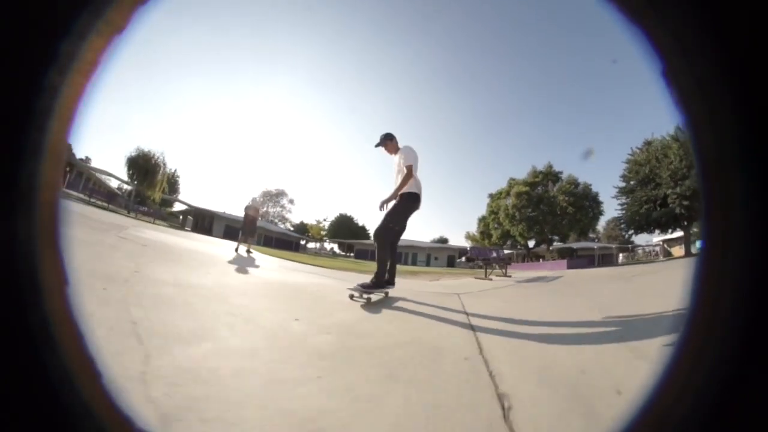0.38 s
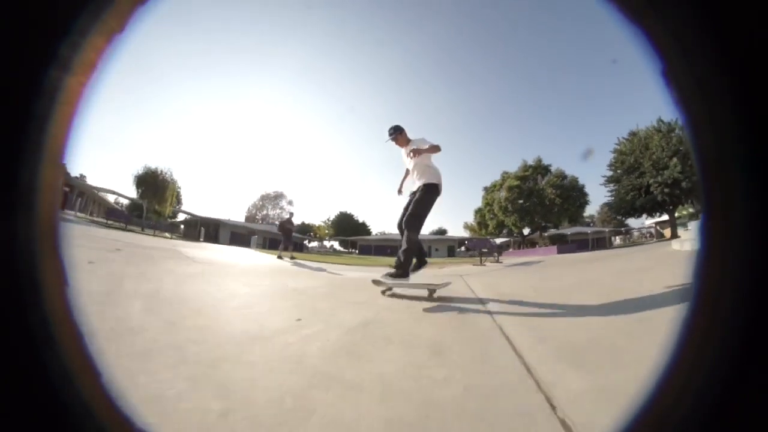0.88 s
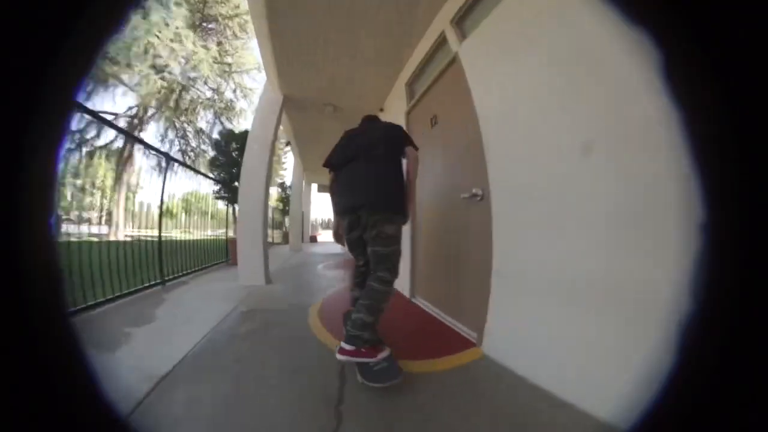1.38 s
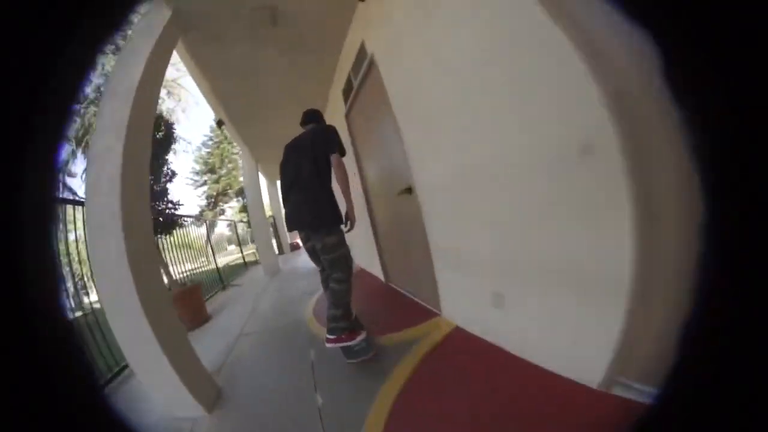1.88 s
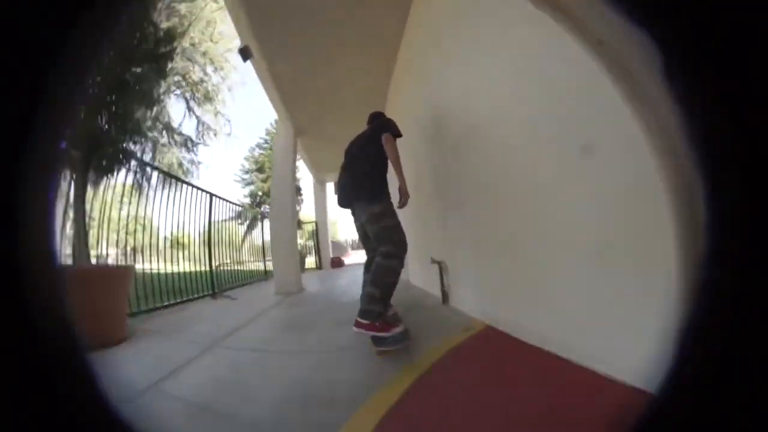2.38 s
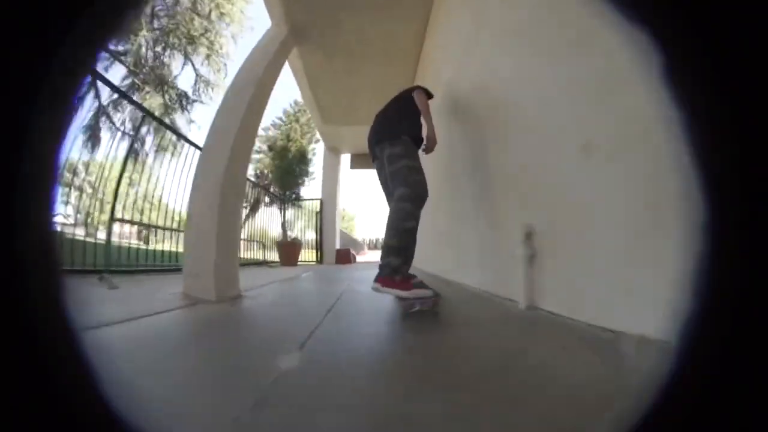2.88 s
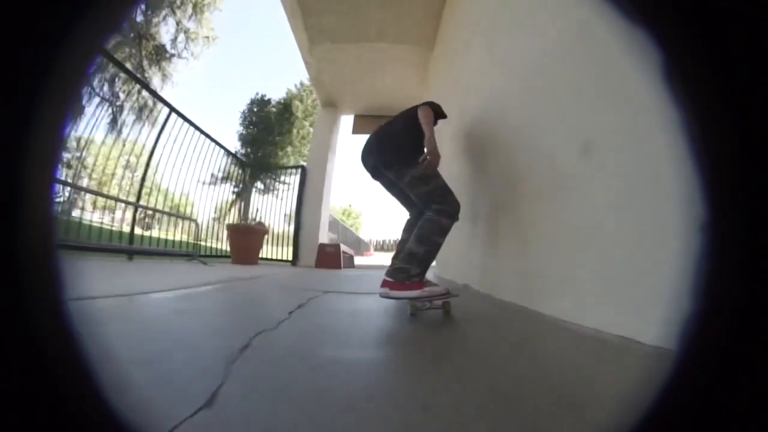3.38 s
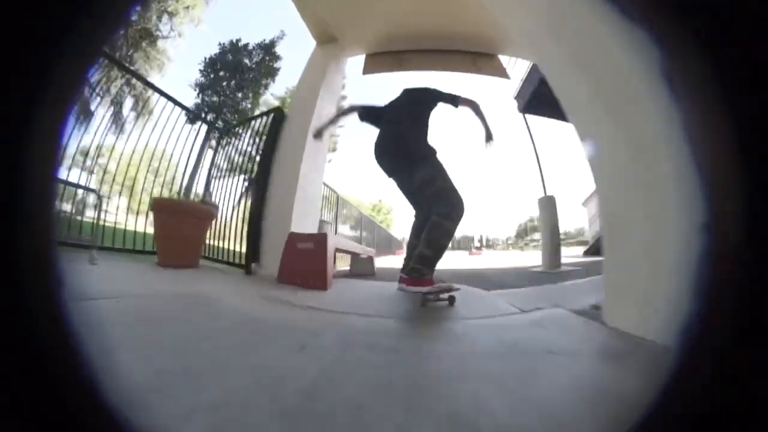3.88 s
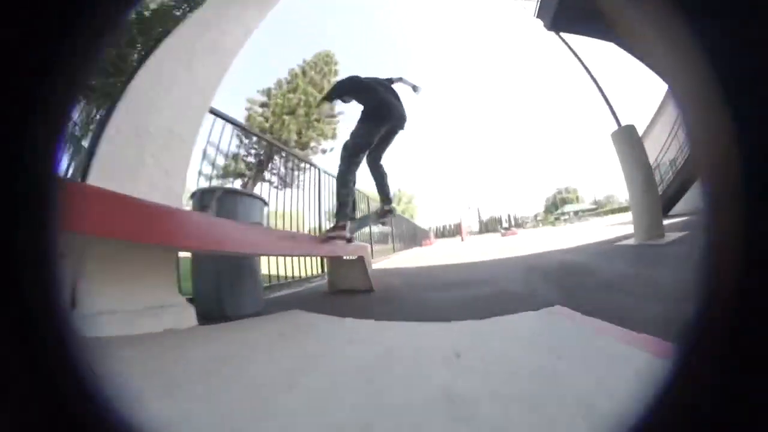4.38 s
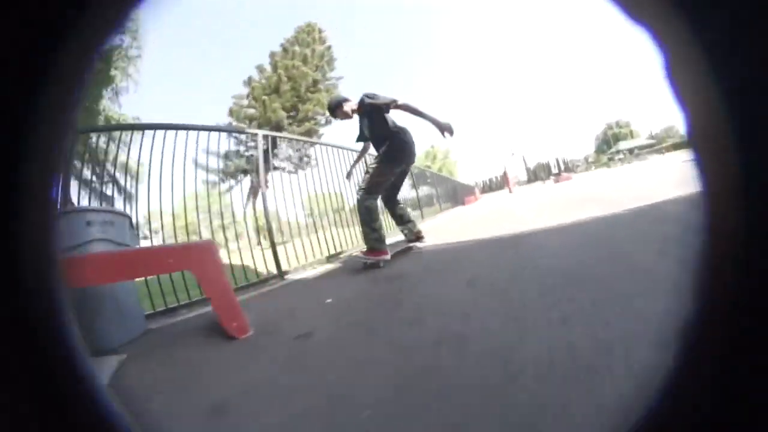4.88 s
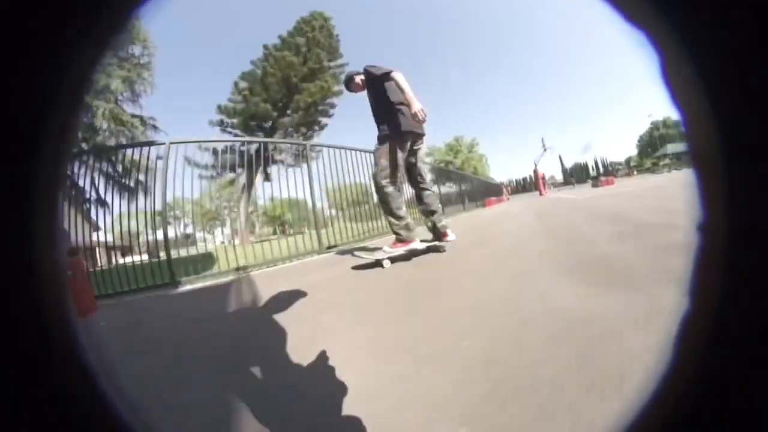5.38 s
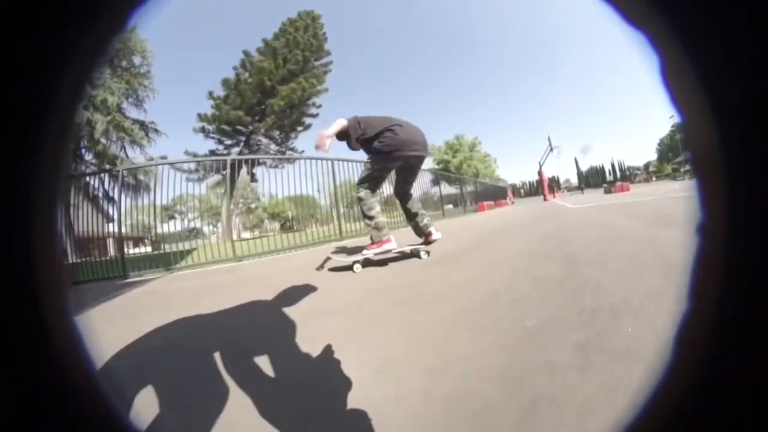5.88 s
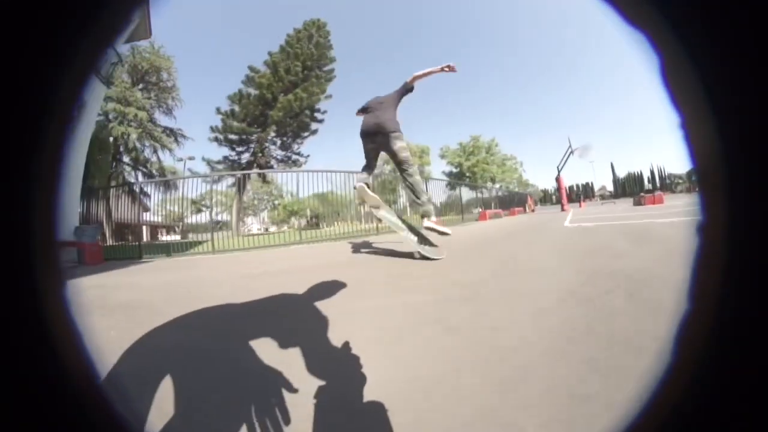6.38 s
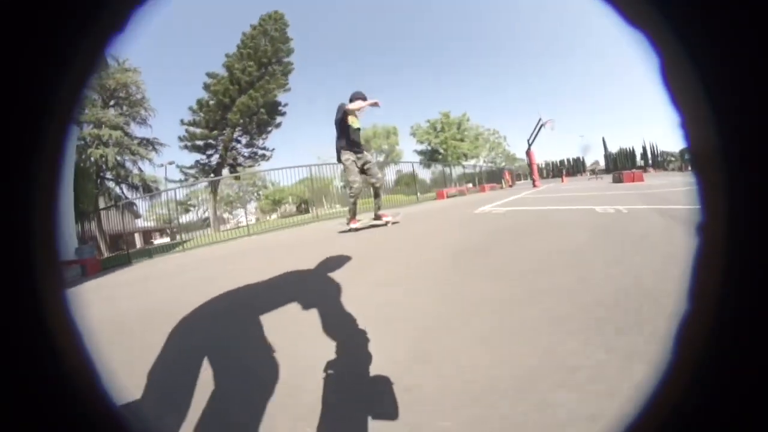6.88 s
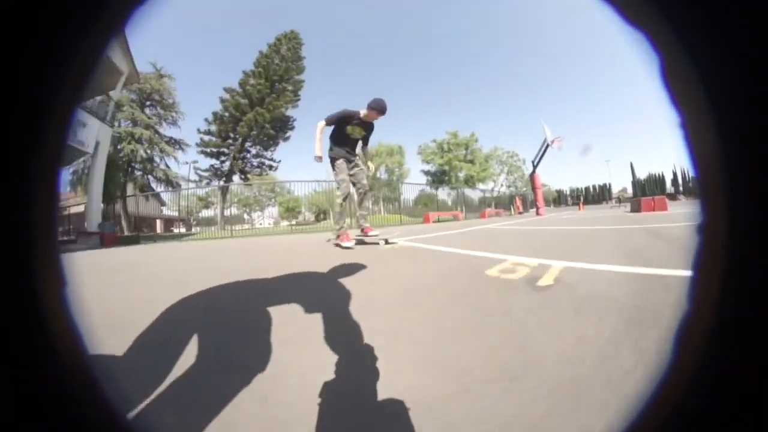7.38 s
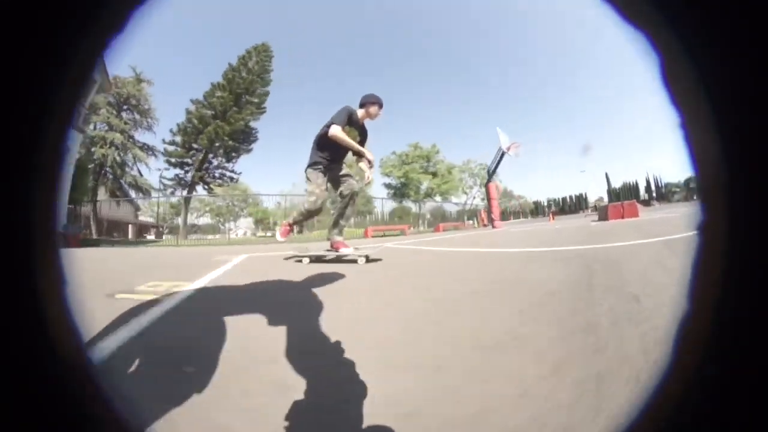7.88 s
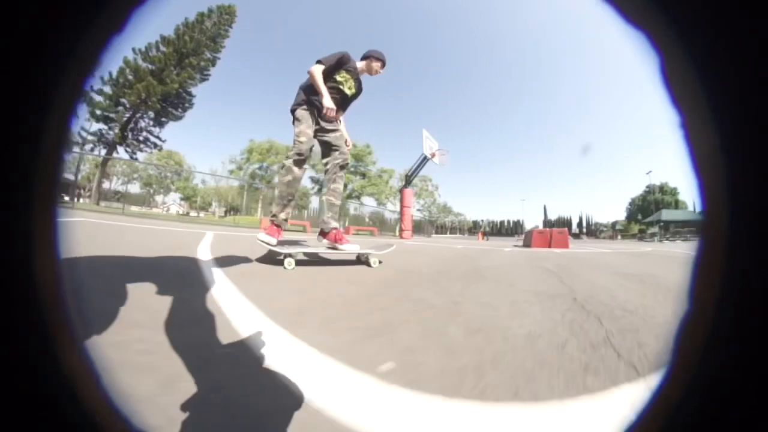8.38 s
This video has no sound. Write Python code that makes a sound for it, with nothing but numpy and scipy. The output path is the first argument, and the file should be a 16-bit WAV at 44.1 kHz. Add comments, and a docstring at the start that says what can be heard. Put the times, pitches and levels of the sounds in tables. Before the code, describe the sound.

Outdoors, skateboard wheels hiss softly over concrete with a few sharp clacks. Abruptly it becomes a loud, boomy roll in a covered walkway, full of wooden knocks and slab-joint clatter. A pop, a hollow half-scrape along a bench edge and a landing crack follow. On open asphalt the roll thins and quiets, then a light pop and a very hard landing snap. The microphone travels on a following board, close to the ground noise and air buffeting.

```python
"""Two skateboards on concrete and asphalt

A skateboard crosses slabs, a covered walkway and asphalt; a second board behind it carries the microphone.
Rolling is grit noise in bands shaken by shared bumps; blows are chatters ringing deck and truck modes.
The deck slides on a bench by stick and slip; treble snaps, pings, squeals, bearing whine and air are added."""
import sys
import numpy as np
from scipy import signal
from scipy.io import wavfile
from scipy.ndimage import uniform_filter1d

SR = 44100
rng = np.random.default_rng(int(sys.argv[2]) if len(sys.argv) > 2 else 0)


def gain_from_db(level_db):
    """Convert decibel levels to linear amplitude factors (20 dB per decade)."""
    decades = np.asarray(level_db, float) / 20
    return 10 ** decades


def output_pcm(signal):
    """Save a mono or channel-first signal as 16-bit PCM at the path in sys.argv[1].

    Samples are clipped to [-1, 1] before scaling.
    """
    pcm = np.clip(np.atleast_2d(signal).T, -1, 1) * 32767
    wavfile.write(sys.argv[1], SR, np.round(pcm).astype(np.int16))


N = 374850


def rms_one(x):
    """Scale to unit power."""
    return x / np.sqrt(np.mean(x ** 2) + 1e-20)


def loudest_one(x):
    """Scale each blow so that its loudest 4 ms have unit power."""
    power = uniform_filter1d(np.mean(x ** 2, axis=0), size=176, axis=-1)
    return x / np.sqrt(np.max(power, axis=-1, keepdims=True))


def in_time(rows):
    """Every column of a curve, sample by sample."""
    s, *columns = np.transpose(rows)
    return [np.interp(np.arange(N) / SR, s, column) for column in columns]


def at_hz(points, hz):
    """Read a spectrum on a log frequency axis."""
    points_hz, values = np.transpose(points)
    return np.interp(np.log(hz), np.log(points_hz), values)


def band(x, low_hz, high_hz):
    """Causal band-pass, 12 dB per octave on each side."""
    return signal.sosfilt(signal.butter(2, [low_hz, high_hz], "band", fs=SR, output="sos"), x)


def mode(x, hz, t60_s):
    """Resonator: a unit click starts a decaying sine of height 1."""
    r, w = gain_from_db(-60 / (t60_s * SR)), 2 * np.pi * hz / SR
    return signal.lfilter([0, np.sin(w)], [1, -2 * r * np.cos(w), r * r], x + 1e-18)


def drift(rate_hz):
    """Slow random curve of spread 1, computed at every 40th sample."""
    r = np.exp(-80 * np.pi * rate_hz / SR)
    slow = signal.lfilter([1], [1, -2 * r, r * r], rng.standard_normal(N // 40 + 2002))[2000:]
    return np.interp(np.arange(N) / 40, np.arange(len(slow)), rms_one(slow))


def grit(shape, spread_db):
    """Dense tiny impacts of widely varying strength."""
    strength_db = spread_db * np.minimum(rng.exponential(1, shape), 6)
    return rms_one(rng.standard_normal(shape) * gain_from_db(strength_db))


def narrow(pitch_hz, width_hz):
    """Narrow band of noise, different in each ear, that follows a moving pitch."""
    lowpass = signal.butter(2, width_hz / 2, fs=SR, output="sos")
    flutter = signal.sosfilt(lowpass, rng.standard_normal((2, 2, N)))
    phase = 2 * np.pi * np.cumsum(pitch_hz) / SR
    return rms_one(flutter[0] * np.cos(phase) + flutter[1] * np.sin(phase))


def sided(lean_db):
    """Left and right gains that differ by lean_db."""
    return gain_from_db(lean_db / 2 * np.array([[1], [-1]]))


def widened(x, spread_db):
    """Raise or lower what differs between the ears."""
    middle = x.mean(axis=0)
    return middle + gain_from_db(spread_db) * (x - middle)


# Each row: frequency in Hz, left-right likeness as a share.
LIKENESS = [(60, 1), (150, 0.79), (380, 0.93), (950, 0.88), (2380, 0.39), (5980, 0.2), (15000, 0.32)]
# Each row: frequency in Hz, left over right in dB.
BALANCE_DB = [(60, 0.5), (150, 0), (380, -0.5), (950, 1), (2380, 1.5), (5980, -1.5), (15000, -3)]


def texture(spectrum, bumps_db, patchy_db, spread_db, per_octave):
    """Grit in narrow bands under shared bumps; each band has its own flicker and stereo width."""
    out, white = 0, grit((2, 2, N), spread_db)
    low_hz, high_hz = spectrum[1][0] * 0.85, min(spectrum[-2][0] * 1.15, 0.4 * SR)
    edges_hz = np.geomspace(low_hz, high_hz, int(per_octave * np.log2(high_hz / low_hz)) + 2)
    for k, (low, high) in enumerate(zip(edges_hz, edges_hz[1:])):
        mid, side = band(white[k % 2], low, high)
        hz = np.sqrt(low * high)
        side_share = np.clip(1 - at_hz(LIKENESS, hz), 0.06, 1)
        level = gain_from_db(at_hz(spectrum, hz) + patchy_db * drift(17.0) + bumps_db)
        stereo = np.sqrt(2 - side_share) * mid + np.sqrt(side_share) * side * [[1], [-1]]
        out = out + level * sided(at_hz(BALANCE_DB, hz)) * stereo
    return rms_one(out)


# Followed board, one list per stretch of ground.
# Each row: time in seconds, load on the wheels in dB, grit under the wheels in dB, left-right lean in dB.
ROLL = [
    [(0.0, -31, -56, -1), (0.082, -42, -73, 6.5), (0.166, -40, -61.5, 1), (0.246, -36.5, -64, 2),
     (0.534, -33.5, -54, 1.5), (0.596, -39, -64, 9), (0.654, -36, -64.5, 8), (0.712, -32.5, -57, 1.5),
     (0.864, -41, -60.5, 4.5), (0.898, -40, -59, 5), (0.926, -36, -59, 8), (0.93, -39.5, -60, -2),
     (1.042, -39, -62, -2), (1.172, -40, -53, 3), (1.3, -38, -49.5, 2)],
    [(1.31, -31, -51.5, -3), (1.49, -28, -46.5, -0.5), (1.93, -28.5, -51, -2), (2.05, -25, -42, -1),
     (2.15, -22.5, -41, 0), (2.2, -22, -42.5, -2), (2.29, -23.5, -42.5, -2), (2.62, -22, -46.5, -1.5),
     (2.75, -32.5, -49.5, -1), (2.8, -28.5, -46, -0.5), (3.35, -27.5, -44.5, -2), (3.53, -35, -51, -4),
     (3.89, -32, -50, -4), (3.92, -42, -50, 3), (4.02, -37, -59, -4), (4.06, -42, -43, 2.5),
     (4.21, -41.5, -54, 0)],
    [(4.22, -33.5, -56, 3), (4.37, -30, -60, 8), (4.52, -43.5, -63, 1), (4.77, -35, -65.5, 1),
     (4.99, -35.5, -64.5, 4), (5.28, -37, -67, -1), (5.39, -37, -63.5, 0), (6.04, -35, -63.5, 2.5),
     (6.52, -39.5, -56, 1), (7.25, -37, -61.5, 3.0), (7.47, -37.5, -54.5, 3), (7.91, -36.5, -58, 4.5),
     (8.13, -31, -49, 3.5), (8.27, -30, -54.5, 2.5), (8.5, -34.5, -51.5, 2.5)],
]


def followed_board():
    """Load, grit and left-right lean of the followed board, all in dB."""
    return in_time(np.concatenate(ROLL))


def driven(level_db, grit_share):
    """Layer gain from a weighted mix, in dB, of wheel load and grit."""
    load_db, grit_db, _ = followed_board()
    return gain_from_db(level_db + (1 - grit_share) * load_db + grit_share * grit_db)


# Slabs, smooth walkway, bench, then patches of asphalt.
# Each row: start in seconds, wheel grind in dB, truck rattle in dB, fine sizzle in dB, deck hum in dB.
GROUND = [(0, -4, 0, 2.5, -15), (1.305, 5, -4.5, 0, -5), (4.22, 7.5, 1.5, 3, -14), (4.6, 3.5, 0, -1, -18),
          (5.27, 5, -0.3, 5.5, -10), (5.75, 5, 0, -2, -8), (7.15, 2.5, -1, 3.5, -6.5),
          (7.9, 3.5, -0.5, 3, -9.5)]


def underfoot():
    """Stepwise gains of grind, rattle, sizzle and hum on the ground of the moment."""
    rows = np.array(GROUND)
    current = np.searchsorted(rows[1:, 0], np.arange(N) / SR)
    return gain_from_db(rows[current, 1:].T)


# Board that carries the microphone, one list per stretch of ground.
# Each row: time in seconds, ground rumble in dB, air on the microphone in dB.
CARRIER = [
    [(0.0, -39, -63), (0.166, -45, -72), (0.386, -42, -70), (0.84, -48.5, -70), (1.06, -56, -71),
     (1.3, -51, -64)],
    [(1.31, -36, -49), (1.54, -35, -44), (1.88, -39, -51), (2.14, -31, -50), (2.48, -29, -41),
     (3.05, -34.5, -38.5), (3.52, -37, -42), (4.21, -32.5, -45), (4.37, -28, -56), (4.5, -43, -66)],
    [(4.51, -49, -70), (4.94, -47, -52), (5.26, -48.5, -58), (5.76, -40.5, -49), (6.33, -44, -48),
     (6.87, -39, -47), (7.64, -37.5, -40.5), (7.92, -30, -42), (8.19, -30.5, -36), (8.5, -31, -50)],
]
# Each row: frequency in Hz, relative density in dB per Hz.
RUMBLE = [(44, -38), (75, -3.5), (103, 3), (145, -1.5), (177, 2), (211, -8), (300, -6), (390, -20),
          (660, -120)]


def rumble(bumps):
    """Bass of the carrying board on the ground, swelling as its wheels drop into joints."""
    level = gain_from_db(in_time(np.concatenate(CARRIER))[0]) + thuds()
    return level * texture(RUMBLE, 0.14 * bumps, patchy_db=1.5, spread_db=-1.0, per_octave=4)


# Each row: frequency in Hz, relative density in dB per Hz.
DRONE = [(150, -13), (260, -9), (298, -10.5), (335, -10), (517, -7.5), (630, -7), (742, -7), (812, -11),
         (873, -10), (1000, -12.5), (1300, -59), (2200, -120)]


def drone(bumps):
    """Low-mid rolling noise that follows almost only the wheel load."""
    return driven(-1.05, 0.0041) * texture(DRONE, 0.89 * bumps, patchy_db=1.5, spread_db=4.0, per_octave=6)


# Each row: frequency in Hz, relative density in dB per Hz.
GRIND = [(560, -25), (950, -6), (1060, 0.5), (1260, -3.5), (1770, -3.5), (2060, -15), (2200, -44),
         (2860, -47), (4840, -120)]


def grind(bumps):
    """Midrange wheel grind from load and grit, set by the ground."""
    noise = texture(GRIND, bumps, patchy_db=-1.0, spread_db=1.0, per_octave=8)
    return underfoot()[0] * driven(-3, 0.41) * noise


# Each row: frequency in Hz, relative density in dB per Hz.
RATTLE = [(1240, -24), (2100, -4.5), (2360, -4), (2770, -11.5), (2980, -4), (3170, -8), (3730, -6),
          (4060, -2.5), (4450, -11.5), (6000, -17), (7800, -28), (13200, -120)]


def rattle(bumps):
    """Truck rattle: uneven grit in the treble, strongly shaken by bumps."""
    noise = texture(RATTLE, 2.5 * bumps, patchy_db=0.5, spread_db=4.0, per_octave=6)
    return underfoot()[1] * driven(3.46, 0.69) * noise


# Each row: frequency in Hz, relative density in dB per Hz.
HISS = [(3290, -31), (5600, -0.5), (5650, -7), (6910, -7.5), (7680, -5.5), (9180, -4.5), (12000, -5.5),
        (15600, -55), (22000, -120)]


def hiss(bumps):
    """High treble that follows mostly the grit under the wheels."""
    return driven(0.84, 0.84) * texture(HISS, 2.3 * bumps, patchy_db=0.0, spread_db=3.0, per_octave=3)


# Each row: bending mode in Hz, level in dB, t60 in seconds.
DECK_HUM = [(530, 0, 0.09), (720, -3.5, 0.065)]


def hum(bumps):
    """Loaded deck hums on its bending modes, driven by grit."""
    modes = sum(gain_from_db(db) * mode(grit(N, spread_db=5.0), hz, t60_s) for hz, db, t60_s in DECK_HUM)
    return underfoot()[3] * driven(-1.05, 0.0041) * gain_from_db(2.1 * bumps) * rms_one(modes)


# Plywood deck. Each row: mode in Hz, level in dB, t60 in seconds.
DECK = [(170, -10, 0.049), (265, 2, 0.05), (322, 13, 0.025), (412, -5, 0.068), (534.4, 1, 0.17),
        (580, -5, 0.051), (700, 8, 0.026), (817, 14.5, 0.019), (935, 14.5, 0.021), (1100, 14, 0.021),
        (1156, 10.5, 0.035), (1326, 19, 0.026), (1507, 2.5, 0.036), (1620, 14.5, 0.024), (1870, 9, 0.037)]


def knocks():
    """Pits tap the wheels at random; each tap rings the deck modes with strengths of its own."""
    taps_per_s = 90
    taps = (rng.random(N) < taps_per_s / SR) * gain_from_db(2.9 * np.minimum(rng.exponential(1, N), 4))
    rings = 0
    for hz, db, t60_s in DECK:
        cushioned_db = db - 4 * np.log2(hz / 600)   # the wheels cushion small knocks
        rings = rings + gain_from_db(cushioned_db) * mode(taps * rng.standard_normal(N), hz, t60_s)
    return driven(-3, 0.31) * rms_one(rings)


# Boards turning against each other.
# Each row: time in seconds, spread of the rolling in dB, spread of blows in dB.
SPREAD = [(0, 9, 1), (0.45, 10, -7), (0.6, 5, -6), (0.9, 7, 3.5), (1.25, -3.5, -1), (2.9, -5, 0),
          (3.1, -0.5, 5), (4.1, 2, 1.5), (4.5, -4, -3), (4.7, -1, -3), (5.2, -1, -4), (6.9, 3, 1),
          (7.05, 3.5, -2), (8.5, 3.5, 2)]


def rolling():
    """Wheels on rough ground: shared bumps of the surface shake the noise layers and hum together."""
    lean_db, spread_db = followed_board()[-1], in_time(SPREAD)[0]
    bumps = drift(6.8) + 0.33 * drift(19.0)
    ground = widened(rumble(bumps), 0.5 * spread_db - 1.5)
    body = widened(drone(bumps) + grind(bumps), spread_db) + hum(bumps) + knocks()
    treble = rattle(bumps) + hiss(bumps)
    return ground + body * sided(0.45 * lean_db) + treble * sided(lean_db)


# Each row: frequency in Hz, relative density in dB per Hz.
GUST = [(10, -30), (20, -31), (40, 3.5), (70, 1.5), (120, -30)]


def breeze():
    """Air buffets the moving microphone: patchy deep noise."""
    air_db = in_time(np.concatenate(CARRIER))[1]
    return gain_from_db(air_db) * texture(GUST, 0, patchy_db=-4.5, spread_db=-1.0, per_octave=2)


# Each row: time in seconds, bearing pitch in Hz.
WHINE = [(0, 3250), (1.15, 3150), (1.3, 3200), (1.33, 3380), (2.2, 3380), (4.2, 3200), (5.0, 3100),
         (6.5, 3250), (8.5, 3300)]


def whine():
    """Dry bearing sings faintly: narrow noise on a wandering pitch, with a flickering level."""
    flicker_db = 1.8 * drift(4.6) + 2.0 * drift(28.0)
    return driven(-12.5, 0.42) * gain_from_db(flicker_db) * narrow(in_time(WHINE)[0], width_hz=520)


# Each row: frequency in Hz, relative density in dB per Hz.
SIZZLE = [(7060, -34), (12000, -15), (12700, 22), (15300, 6), (16300, -24)]


def sizzle():
    """Bearing sizzle at the very top, following grit and ground."""
    noise = texture(SIZZLE, 0, patchy_db=-3.5, spread_db=3.5, per_octave=4)
    return underfoot()[2] * driven(-6.5, 0.85) * noise


def struck(force, modes, favour_db):
    """Each blow drives every mode with a strength and a slight detuning of its own."""
    hz, db, t60_s = np.transpose(modes)[..., None]
    strength, shift = rng.standard_normal((2, force.shape[1], len(modes), 1))
    t = np.arange(int(0.06 * SR)) / SR
    mode_db = db + (favour_db + 2.9 * strength[..., 0])[..., None]
    shifted_hz = hz * (1 + 0.039 * shift)   # the rider's weight shifts the modes
    rings = gain_from_db(mode_db) * np.exp(-np.log(1000) * t / t60_s) * np.sin(2 * np.pi * shifted_hz * t)
    return signal.fftconvolve(force, rings.sum(axis=1)[None], axes=-1)[..., :force.shape[-1]]


# Each row: time in seconds, deck level in dB, deck pitch in Hz, truck clack level in dB, contact in seconds.
BLOWS = [(0.023, -35, 580, -47, 0.012), (0.06, -27.5, 496, -37, 0.015), (0.086, -23, 596, -32, 0.0042),
         (0.181, -34, 506, -49, 0.01), (0.263, -25, 500, -56, 0.0049), (0.427, -28, 785, -40, 0.0039),
         (0.519, -26, 1900, -18.5, 0.0017), (0.521, -14, 1140, -22, 0.0031),
         (0.709, -31, 333, -33.5, 0.0022), (0.747, -24.5, 527, -34, 0.0057), (0.848, -31, 476, -43, 0.0063),
         (0.888, -34, 800, -57, 0.004), (0.912, -27, 835, -55, 0.0054), (0.954, -16, 780, -18, 0.0066),
         (0.973, -31, 1500, -32, 0.006), (1.004, -31, 1500, -33, 0.0087), (1.021, -13.5, 1960, -13, 0.0035),
         (1.023, -19, 372, -17, 0.0034), (1.068, -25.5, 310, -53, 0.0035), (1.094, -26, 334, -53, 0.0042),
         (1.193, -30.5, 180, -51, 0.0047), (1.262, -27, 294, -50, 0.0028), (1.334, -22.5, 910, -37, 0.0074),
         (1.424, -19.5, 1040, -41, 0.012), (1.436, -18.5, 630, -37, 0.015), (1.466, -28, 363, -30, 0.0055),
         (1.543, -11, 523, -30, 0.01), (1.582, -16.5, 1330, -37, 0.0071), (1.771, -38, 550, -36, 0.0087),
         (1.862, -21.5, 536, -37, 0.024), (1.959, -9, 1010, -24, 0.0049), (1.971, -13, 850, -35, 0.0045),
         (2.029, -6, 1140, -20.5, 0.0032), (2.04, -10.5, 790, -24, 0.0049),
         (2.071, -8.5, 1230, -24, 0.0024), (2.076, -8, 1150, -24, 0.0029), (2.139, -7.5, 1330, -20, 0.0059),
         (2.151, -7, 1330, -22, 0.0036), (2.168, -13, 572, -39, 0.0066), (2.344, -3.5, 1040, -17, 0.0039),
         (2.353, -4.5, 815, -23, 0.0036), (2.376, -13, 1000, -31, 0.004), (2.4, -16, 1507, -32, 0.01),
         (2.428, -17.5, 800, -28, 0.004), (2.465, -10.5, 1290, -29, 0.0056),
         (2.467, -10.5, 310, -25, 0.011), (2.493, -11.5, 403, -24.5, 0.004),
         (2.505, -10.5, 605, -31, 0.0088), (2.549, -11.5, 600, -35, 0.0015), (2.561, -20, 393, -25, 0.0019),
         (2.617, -15.5, 1910, -29, 0.0032), (2.624, -12, 383, -26, 0.0062), (2.635, -15.5, 810, -28, 0.003),
         (2.687, -21, 746, -49, 0.003), (2.733, -9.5, 570, -27, 0.0057), (2.739, -15, 296, -28, 0.0046),
         (2.755, -16, 550, -32, 0.0075), (2.807, -6.5, 530, -25, 0.0038), (2.82, -13.5, 520, -30, 0.0047),
         (2.93, -7, 510, -24, 0.0054), (2.944, -11.5, 700, -24, 0.0088), (3.091, -20, 345, -36, 0.0039),
         (3.155, -16, 517, -43, 0.01), (3.199, -13.5, 328, -25.5, 0.011), (3.353, -19.5, 520, -50, 0.0073),
         (3.431, -5.5, 1550, -15, 0.0036), (3.445, -5, 647, -19.5, 0.0059),
         (3.558, -9.5, 670, -25.5, 0.0047), (3.571, -8, 520, -30, 0.0045), (3.774, -13, 760, -29, 0.0035),
         (3.78, -11, 720, -26, 0.0044), (3.793, -13, 537, -37, 0.0042), (3.879, -9, 604, -28.5, 0.0046),
         (3.885, -16, 417, -21, 0.0042), (3.894, -14, 530, -28, 0.005), (3.903, -6.5, 600, -24, 0.0044),
         (3.91, -10, 1000, -27, 0.0048), (3.919, -12.5, 845, -20, 0.0087), (4.017, -10, 2250, -8, 0.0038),
         (4.032, -14.5, 1200, -21.5, 0.0087), (4.059, -10, 467, -15, 0.0033),
         (4.069, -11, 915, -28, 0.0048), (4.081, -14, 590, -21, 0.0044), (4.093, -17.5, 800, -28, 0.005),
         (4.236, -18, 1500, -21, 0.0032), (4.2412, -8, 1405, -10, 0.0019), (4.248, -6, 1930, -10.5, 0.0044),
         (4.252, -7, 590, -42, 0.006), (4.258, -8, 209, -41, 0.0082), (4.27, -12, 570, -43, 0.0089),
         (4.401, -18, 505, -64, 0.0081), (4.484, -16.5, 535, -30.5, 0.0057),
         (4.501, -17.5, 630, -34, 0.005), (4.7285, -6.5, 700, -10, 0.0042),
         (4.733, -7, 1290, -14.5, 0.0031), (4.738, -8, 850, -17, 0.0044), (4.745, -12, 1100, -27, 0.0027),
         (4.766, -17.5, 1290, -34, 0.0075), (4.762, -16, 520, -38, 0.0061), (4.777, -21, 530, -38, 0.01),
         (4.8, -22, 494, -36, 0.0085), (4.824, -31, 348, -41, 0.01), (4.891, -23.5, 544, -42, 0.0048),
         (5.004, -32, 856, -38, 0.0072), (5.225, -39, 401, -45, 0.013), (5.285, -21, 1100, -26, 0.0028),
         (5.291, -23, 670, -31.5, 0.0052), (5.352, -30, 530, -44, 0.0063), (5.403, -46, 482, -51, 0.0052),
         (6.409, -23, 1930, -26, 0.0025), (6.414, -28, 1980, -32, 0.003), (6.42, -34, 2000, -28.5, 0.0049),
         (6.477, -44, 727, -33, 0.012), (6.655, -29, 1680, -41, 0.0074), (6.718, -19.5, 466, -22.5, 0.0028),
         (6.794, -9.5, 880, -9.5, 0.0047), (6.801, -3, 1270, -8.5, 0.002), (6.811, -10.5, 1000, -8, 0.0021),
         (6.817, -14, 596, -21, 0.0027), (6.823, -1.5, 1550, -16, 0.0012), (6.828, -16, 450, -35, 0.0022),
         (6.84, -40, 1100, -44, 0.004), (6.855, -23.5, 1300, -34, 0.0072), (6.858, -28, 323, -50, 0.005),
         (6.92, -23.5, 620, -59, 0.004), (7.05, -27, 700, -41, 0.0058), (7.186, -29, 605, -39, 0.0062),
         (7.377, -45, 533, -53, 0.0047), (7.453, -33, 587, -40, 0.0055), (7.501, -32, 670, -36, 0.0062),
         (7.644, -31, 544, -37, 0.0021), (8.064, -26, 1000, -37, 0.0082), (8.078, -21, 930, -39, 0.0041),
         (8.088, -17.5, 560, -42, 0.0069), (8.116, -27, 600, -49, 0.0079), (8.222, -18, 580, -37, 0.0093),
         (8.235, -15, 380, -31, 0.0057), (8.26, -23.5, 300, -46, 0.0072), (8.277, -23, 332, -53, 0.008),
         (8.343, -24, 205, -51, 0.013), (8.384, -20, 248, -48, 0.0055), (8.412, -16.5, 260, -52, 0.0072),
         (8.447, -19, 358, -39, 0.0089), (8.467, -22, 260, -48, 0.0086)]
# Steel trucks. Each row: mode in Hz, level in dB, t60 in seconds.
TRUCKS = [(2200, 17, 0.0049), (2400, 9.5, 0.0054), (2630, 2, 0.01), (3150, 15, 0.0055), (3470, 9.5, 0.0048),
          (4160, 2, 0.014), (4580, 10, 0.003), (4870, 3, 0.012)]
# Open yard, covered walkway, open court.
# Each row: time in seconds, echo in dB, topmost fizz of blows in dB, fizz of blows in dB.
SHELTER = [(0, -4.5, -6, -5.5), (1.3, -14.5, 8, -11), (1.32, -1, -25, -13.5), (4.1, -6.5, -23, -15),
           (4.2, -1.5, -29, -21), (4.55, -1.5, -20.5, -16), (4.6, 1, -14, -12), (6.0, -11.5, -12, -18),
           (8.5, -2, -8, -11)]


def blows():
    """A blow is a short chatter of contacts: it swells, dies, and leaves deck and trucks ringing briefly."""
    s, deck_db, pitch_hz, clack_db, contact_s = np.transpose(BLOWS)[:, :, None]
    t = np.arange(int(0.15 * SR)) / SR
    u = t / np.clip(contact_s, 0.0005, 0.04)
    shared, apart = (1 - np.exp(-u / 0.5)) * np.exp(-u) * grit((2, len(BLOWS), len(t)), spread_db=3.0)
    wide = shared + 0.6 * apart * [[[1]], [[-1]]]   # metal parts at both ends reach the two ears differently

    # where the deck is struck decides which modes speak most
    deck_favour_db = -14.0 * np.abs(np.log2(np.array(DECK)[:, 0] / pitch_hz))
    spot_db = 15.5 - 60 * t * pitch_hz / 14.4   # the struck spot dies by 60 dB in 14.4 cycles
    spot = gain_from_db(spot_db) * np.sin(2 * np.pi * pitch_hz * t)
    spot = signal.fftconvolve(shared, spot, axes=-1)[:, :len(t)]
    slap = gain_from_db(15.5) * shared   # bare slap of wood
    deck = loudest_one(band(struck(shared[None], DECK, deck_favour_db) + spot + slap, 131, 2100))

    # a higher deck pitch favours the lower truck modes
    truck_favour_db = -3.0 * np.log2(np.array(TRUCKS)[:, 0] / 3000) * np.log2(pitch_hz / 600)
    clack = loudest_one(band(struck(wide, TRUCKS, truck_favour_db), 2120, 5070))

    top_db, place_db = np.array(in_time(SHELTER))[1:, (s * SR).astype(int)]
    fizz_db = place_db + 0.54 * clack_db + 0.46 * deck_db
    snap = wide * (1 + 1.8 * np.exp(-t / 0.00092))   # stronger at first touch
    fizz = loudest_one(band(snap, 5000, 12900) + gain_from_db(top_db) * band(snap, 11000, 16000))

    sound = (gain_from_db(deck_db) * deck + gain_from_db(clack_db) * clack + gain_from_db(fizz_db) * fizz) / np.sqrt(2)
    out = np.zeros((2, N + len(t)))
    for start, blow in zip((s[:, 0] * SR).astype(int), sound.transpose(1, 0, 2)):
        out[:, start:start + len(t)] += blow
    return out[:, :N]


# Ground and walls. Each row: left delay in seconds, right delay in seconds, level in dB.
ECHOES = [(.0031, 0.00111, -15.5), (0.014, 0.012, -13), (0.027, 0.036, -18), (.043, 0.065, -20)]


def surroundings(x):
    """A few echoes and a short diffuse tail whose treble dies first, partly different in each ear."""
    t = np.arange(int(0.4 * SR)) / SR
    shared, apart = rng.standard_normal((2, len(t)))
    noise = shared + 0.5 * apart * [[1], [-1]]
    split_hz = 1860
    low_tail = gain_from_db(-35 - 60 * t / 0.35) * band(noise, 58, split_hz)
    treble_tail = gain_from_db(-36 - 60 * t / 0.29) * band(noise, split_hz, 17000)
    response = low_tail + treble_tail
    for left_s, right_s, db in ECHOES:
        response[[0, 1], [int(left_s * SR), int(right_s * SR)]] += gain_from_db(db)
    return signal.fftconvolve(x, response, axes=1)[:, :N]


# Each row: time in seconds, relative level in dB, length in seconds.
SNAPS = [(0.062, -26, 0.0027), (0.08, -33, 0.003), (0.1514, -38, 0.003), (0.182, -35, 0.0025),
         (0.28, -41, 0.003), (0.485, -32, 0.003), (0.519, -26, 0.0026), (0.753, -38, 0.003),
         (0.848, -35, 0.003), (0.954, -14.5, 0.0047), (1.024, -19, 0.0039), (1.044, -29, 0.0036),
         (1.3359, -31, 0.003), (2.04, -30, 0.0033), (2.14, -21, 0.003), (2.155, -18, 0.0033),
         (2.356, -17, 0.0034), (2.47, -24, 0.003), (2.622, -28, 0.0035), (2.743, -25, 0.003),
         (2.931, -43, 0.003), (3.445, -17, 0.0033), (3.882, -15.5, 0.0034), (4.064, -14.5, 0.003),
         (4.735, -13, 0.0022), (4.77, -25, 0.0032), (5.2275, -42, 0.003), (5.269, -38, 0.0029),
         (5.286, -21, 0.0028), (5.303, -33, 0.003), (5.352, -40, 0.003), (6.481, -31.5, 0.0049),
         (6.795, -10.5, 0.0062), (6.814, -18, 0.0033), (6.821, -19, 0.003), (7.048, -38, 0.003),
         (7.1866, -34, 0.003), (7.352, -33, 0.003), (7.3806, -31, 0.0028), (7.406, -37, 0.003),
         (7.4545, -31, 0.0027), (7.482, -31, 0.003), (7.6194, -34, 0.003), (8.181, -31, 0.003),
         (8.2362, -35, 0.003), (8.379, -31, 0.003), (8.4514, -35, 0.003)]


def snaps():
    """Bright treble snaps: short noise bursts, many on the landings and knocks, some alone while rolling."""
    t = np.arange(int(0.05 * SR)) / SR
    shared, apart = grit((2, len(SNAPS), len(t)), spread_db=3.5)
    bursts = rms_one(band(shared + 0.5 * apart * [[[1]], [[-1]]], 5800, 14400))
    out = np.zeros((2, N + len(t)))
    for (s, db, length_s), burst in zip(SNAPS, bursts.transpose(1, 0, 2)):
        u = t / np.clip(length_s, 0.0005, 0.02)
        envelope = (1 - np.exp(-u / 0.44)) * np.exp(-u)
        start = int(s * SR)
        out[:, start:start + len(t)] += gain_from_db(db - 2.0) * envelope * burst
    return out[:, :N]


# Each row: start in seconds, fade in seconds, level in dB, pitch in Hz.
SQUEALS = [(1.152, 0.075, -40, 3150), (1.152, 0.06, -46, 2400), (1.31, 0.12, -47, 3400)]


def squeals():
    """A bearing sings briefly: narrow noise that rises within milliseconds and fades."""
    t = np.arange(N) / SR
    out, rise_s = 0, 0.006
    for s, fade_s, db, hz in SQUEALS:
        u = np.maximum(t - s, 0)
        envelope = (1 - np.exp(-u / rise_s)) * np.exp(-(u / fade_s) ** 2)
        out = out + gain_from_db(db) * envelope * narrow(np.full(N, hz), width_hz=220)
    return out


# Each row: time in seconds, relative level in dB, pitch in Hz.
PINGS = [(1.424, -30.5, 3480), (1.468, -36, 3420), (1.543, -28, 3380), (3.91, -17.5, 3840),
         (4.279, -21, 2950), (4.354, -29, 2300), (4.691, -37, 4670), (4.701, -38, 3500), (4.713, -44, 4800),
         (4.722, -42, 5060), (4.758, -35, 3000), (4.9, -37, 3600), (5.013, -34, 3000), (5.288, -31, 5960),
         (5.355, -43, 6070), (5.406, -46, 6100), (5.407, -44, 4000), (6.41, -26.5, 3160),
         (6.484, -38, 5300), (6.488, -35, 6400), (6.492, -38, 4800), (6.719, -29, 3360), (8.069, -33, 3570),
         (8.081, -31, 4400), (8.081, -31, 3330), (8.095, -25, 3500), (8.095, -33, 4700), (8.103, -28, 3600),
         (8.113, -38, 3800), (8.121, -40, 3700), (8.096, -40, 6000), (8.227, -36, 5300), (8.235, -35, 5700),
         (8.237, -24, 4580), (8.238, -26, 3140), (8.239, -39, 6500), (8.252, -36, 6000)]


def pings():
    """Loose washers on the axles ping: clusters of four partials that die within milliseconds."""
    t = np.arange(int(0.05 * SR)) / SR
    rise_s, t60_s = 0.00054, 0.014
    out = np.zeros((2, N + len(t)))
    for (s, db, hz), chance in zip(PINGS, rng.standard_normal((len(PINGS), 3, 4, 1))):
        steps = np.array([[0], [1], [-1], [2]]) + 0.18 * chance[0]
        phase = 2 * np.pi * hz * (1 + 0.106 * steps) * t + 2 * chance[1]
        ear_phase = 0.9 * chance[2] * np.array([[[1]], [[-1]]])
        partials = gain_from_db(-4.0 * np.abs(steps)) * np.sin(phase + ear_phase)
        envelope = gain_from_db(db + 7.0 - 60 * t / t60_s) * (1 - np.exp(-t / rise_s))
        start = int(s * SR)
        out[:, start:start + len(t)] += envelope * partials.sum(axis=1)
    return out[:, :N]


# Each row: time in seconds, relative level in dB.
THUDS = [(1.526, -24), (2.119, -30), (2.417, -17), (2.81, -22), (3.189, -18.5), (3.904, -22), (4.051, -29),
         (4.73, -32), (6.803, -52), (7.29, -32), (7.335, -30), (7.39, -35), (8.089, -45), (8.336, -16)]


def thuds():
    """Rumble gain as wheels drop into joints: each drop swells quickly and dies away."""
    t = np.arange(N) / SR
    out, rise_s, fall_s = 0, 0.002, 0.03
    for s, db in THUDS:
        swell = 1 - np.exp(-np.maximum(t - s, 0) / rise_s)
        out = out + gain_from_db(db - 1) * swell * np.exp(-np.abs(t - s) / fall_s)
    return out


# Each row: time in seconds, bench boom in dB, scrape in dB, scrape pitch in Hz, bright rasp in dB.
SLIDE = [(4.27, -19, -24, 1037, -42), (4.295, -25, -33, 1584, -40), (4.32, -20.5, -30, 1776, -40),
         (4.345, -24, -36, 1295, -35), (4.362, -23, -27, 1100, -42), (4.385, -37, -25, 889, -48),
         (4.41, -26.5, -34, 1217, -45), (4.436, -28, -38, 1465, -45), (4.46, -42, -20, 1473, -37.5),
         (4.506, -47, -31, 1183, -35), (4.56, -40, -40, 1406, -48)]
# Each row: mode in Hz, level in dB, t60 in seconds.
BENCH = [(182, -2, 0.1), (211, -2, 0.06), (265, -5, 0.045), (520, -12, 0.04)]


def slide():
    """Stick and slip on the bench edge: the bench booms, the scrape changes pitch as the contact travels."""
    boom_db, scrape_db, pitch_hz, rasp_db = in_time(SLIDE)
    start_s, end_s = SLIDE[0][0], SLIDE[-1][0]
    touching = np.interp(np.arange(N) / SR, [start_s - 0.01, start_s, end_s, end_s + 0.02], [0, 1, 1, 0])
    slips, slips_per_s = grit(N, spread_db=3.5), 600
    ear_difference = 1 + 0.25 * rng.standard_normal(N) * [[1], [-1]]
    catches = (rng.random(N) < slips_per_s / SR) * slips * ear_difference
    boom = rms_one(sum(gain_from_db(db) * mode(catches, hz, t60_s) for hz, db, t60_s in BENCH))
    rasp = rms_one(band(slips, 1100, 3540))   # bright edge of the same slips
    scrape = narrow(pitch_hz, width_hz=600) * gain_from_db(1.8 * drift(60.0))
    return touching * (gain_from_db(boom_db) * boom + gain_from_db(scrape_db) * scrape + gain_from_db(rasp_db) * rasp)


def scene():
    """Rolling, air, bearings and slide, with blows, snaps and pings and their echoes."""
    hits, small = blows() + snaps() * sided(-2.5), pings()
    lean_db = followed_board()[-1]
    to_walls = (hits + gain_from_db(-8) * small) * gain_from_db(in_time(SHELTER)[0])
    echoes = surroundings(to_walls)
    struck_board = widened(hits + small + echoes, in_time(SPREAD)[1]) * sided(0.77 * lean_db)
    steady = rolling() + breeze() + sizzle() + whine()
    return steady + squeals() + slide() * sided(6.2) + struck_board


def roll_off(x):
    """The treble ends steeply here."""
    return signal.sosfilt(signal.butter(12, 16970, fs=SR, output="sos"), x)


def record(dry):
    """The microphone loses the deepest bass; the loudest peaks are rounded."""
    heard = signal.sosfilt(signal.butter(2, 14, "high", fs=SR, output="sos"), dry)
    mix = 1.181 * np.tanh(heard / 1.473)
    return roll_off(mix)


dry = scene()
out = record(dry)
output_pcm(out)
```